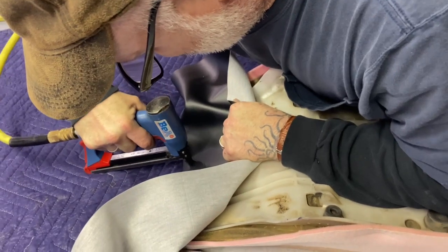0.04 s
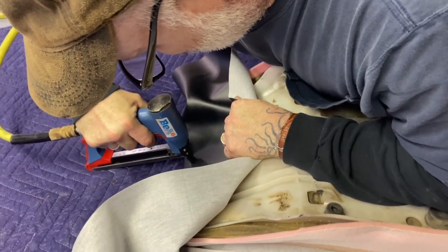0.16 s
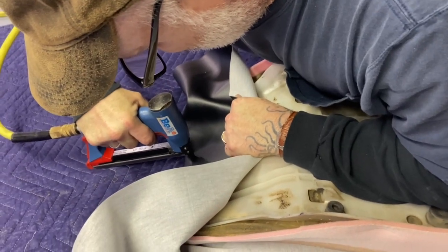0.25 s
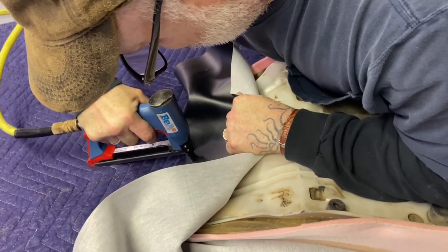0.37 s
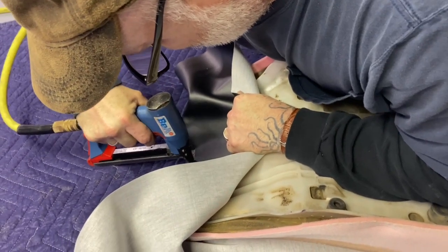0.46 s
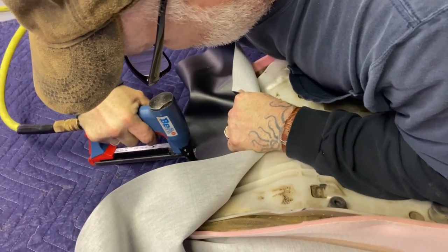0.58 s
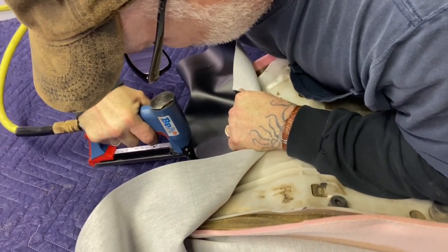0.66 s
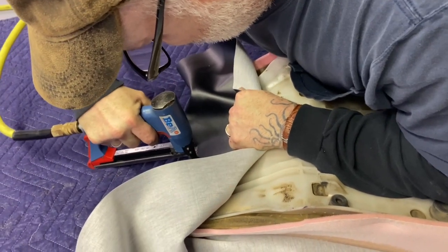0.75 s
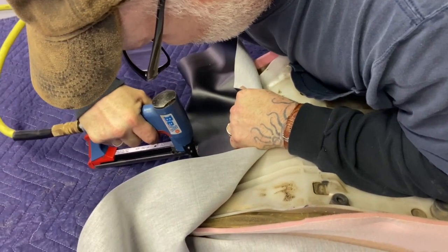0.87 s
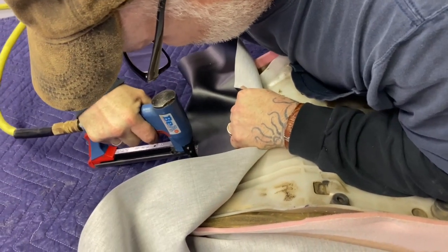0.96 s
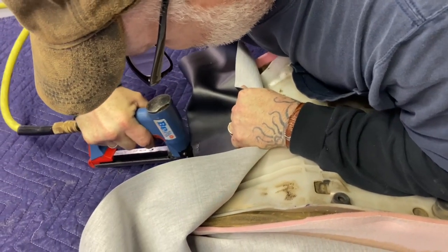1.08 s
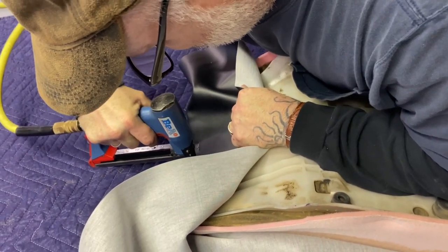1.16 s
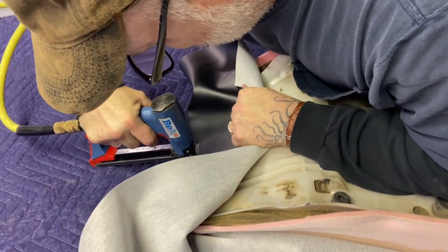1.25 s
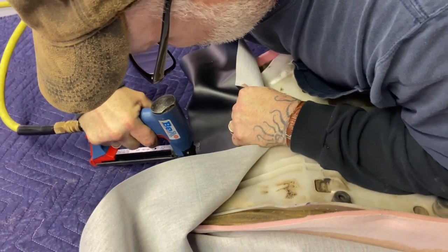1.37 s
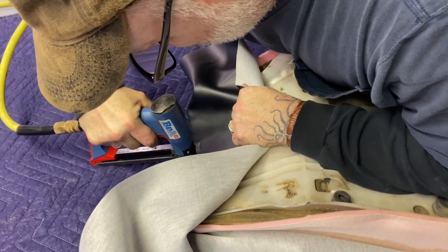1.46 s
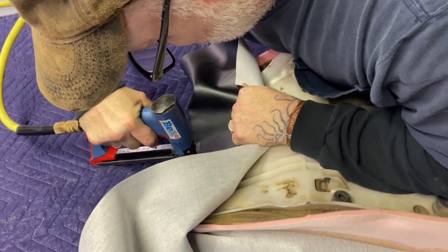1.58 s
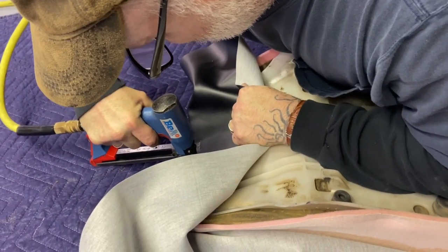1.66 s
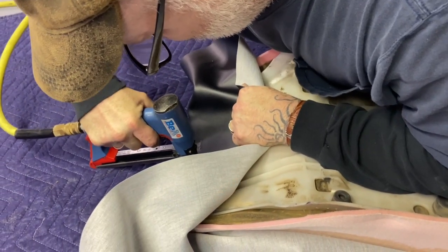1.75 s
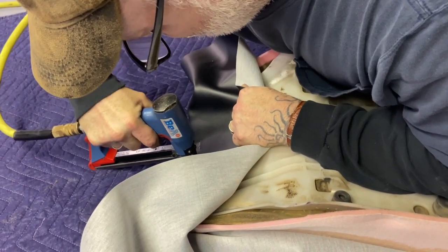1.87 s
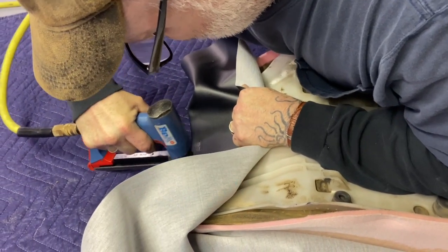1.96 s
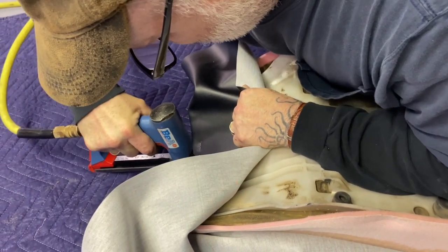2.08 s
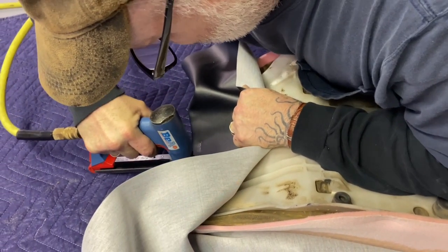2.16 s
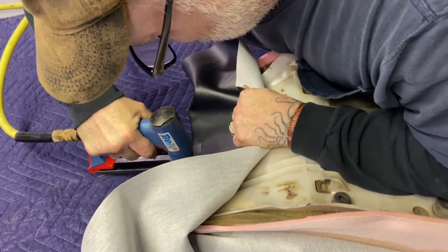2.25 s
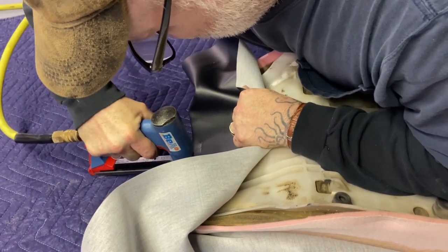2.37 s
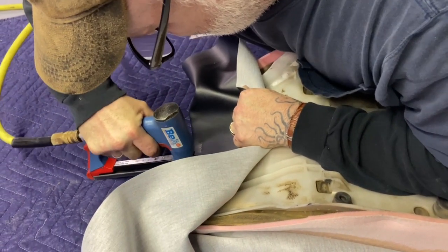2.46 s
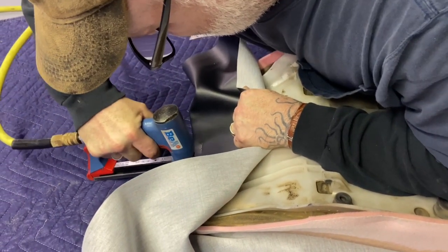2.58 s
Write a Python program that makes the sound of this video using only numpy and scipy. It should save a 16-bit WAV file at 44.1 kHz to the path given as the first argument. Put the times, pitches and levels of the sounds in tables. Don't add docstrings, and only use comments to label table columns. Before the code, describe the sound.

Close up in a small workshop, an air stapler cracks three times at uneven spacing, each shot followed by a valve knock and short exhaust puff, with faint vinyl ticks and low rumble between, captured in stereo.

```python
import sys
import numpy as np
from scipy import signal
from scipy.fft import rfft, irfft
from scipy.io import wavfile
from scipy.ndimage import uniform_filter1d

SR = 44100
rng = np.random.default_rng(int(sys.argv[2]) if len(sys.argv) > 2 else 0)


def magnitude_from_level(level_db):
    exponent = np.asarray(level_db, float) / 20
    return 10 ** exponent


def dump_mix(stems):
    frames = np.atleast_2d(stems).T
    limited = np.clip(frames, -1, 1)
    pcm = np.round(limited * 32767).astype(np.int16)
    wavfile.write(sys.argv[1], SR, pcm)


N = 114660
T = np.arange(N) / SR
HZ = np.fft.rfftfreq(N, 1 / SR)

# strike_s, strike_db, release_s, knock_db, vent_db
FIRINGS = [
    (0.2606, 1, .3584, -1, -14),
    (0.8473, 0, .9856, 2.5, -12),
    (1.7371, -0.5, 1.8687, 2, -11.5),
]
# start_s, tool_db, bench_db
BUMPS = [
    (0.7876, -35, -45),
    (.7930, -26.5, -42),
    (2.0765, -42, -23),
]
RETURN_S = 0.022
STRIKE_LEAD_S = .005


def strike():
    # start_s after the strike, nose_db, blade_db
    blows = [
        (-.0002, -37.5, -6.5),
        (.0008, -12.5, -13),
        (.0035, -23, -14.5),
        (.0045, -29.5, -13.5),
        (.0053, -3.5, -22),
        (.0070, -7, -27.5),
    ]
    # pitch_hz, level_db, t60_s
    nose_modes = [(524, -2, 0.03), (700, -2, 0.042), (963, -1, 0.016), (1340, -6, .03)]
    # pitch_hz, level_db, t60_s
    blade_modes = [(1890, -5.5, .007), (2280, 1.5, .008), (3144, 0.5, 0.0067), (4040, -10, 0.0028),
                   (4930, -12, 0.01), (7560, -3.5, 0.011)]
    t = T[:SR // 2] - STRIKE_LEAD_S
    tool = 0
    for start_s, nose_db, blade_db in blows:
        tool = tool + magnitude_from_level(nose_db) * ring(nose_modes, t - start_s)
        tool = tool - magnitude_from_level(blade_db) * ring(blade_modes, t - start_s)
    smother_s, smother_fade_s, smothered_db = 0.0094, 0.0014, -22.5
    free = 1 / (1 + np.exp(np.clip((t - smother_s) / smother_fade_s, -50, 50)))
    thud_hz, thud_db, peak_s, spread_s = 211, -14.5, .0082, 0.0038
    thud = np.exp(-((t - peak_s) / spread_s) ** 2 / 2) * np.cos(2 * np.pi * thud_hz * t)
    return tool * (free + magnitude_from_level(smothered_db)) + magnitude_from_level(thud_db) * thud


def firings():
    # pitch_hz, level_db
    buzz_spectrum = [(140, 0.5), (300, -5), (600, 1.5), (1100, -5.5), (2000, -4.5), (3300, -10),
                     (5000, -18), (16000, -42)]
    buzz_db, lag_s, t60_s = -29.5, 0.0027, 0.36
    rows, buzz = [], 0
    for strike_s, strike_db, *_ in FIRINGS:
        rows.append((strike_s - STRIKE_LEAD_S, strike_db))
        buzz = buzz + magnitude_from_level(strike_db + buzz_db) * fade(T - strike_s - lag_s, t60_s)
    return place(strike(), rows) + buzz * noise(buzz_spectrum)


def inlet_air():
    # open_s, rise_db_per_ms, hiss_db
    pulls = [
        (.246, 2.22, -18.5),
        (0.833, 3.5, -20.5),
        (1.724, 4.5, -22),
    ]
    # pitch_hz, level_db
    inlet_spectrum = [(300, -19), (1500, -8.5), (4000, -7), (7500, -5), (11000, 3.5), (15500, -1),
                      (16500, -28.5)]
    # pitch_hz, level_db
    seep_spectrum = [(1000, -25.5), (2200, 0), (5000, -1), (6000, -10), (7500, -4.5), (12000, -8.5),
                     (16000, -31.5)]
    creep_db_per_ms, cut_s, fade_s = 0.2068, .0065, 0.00084
    inlet = 0
    for (strike_s, *_), (open_s, rise_db_per_ms, hiss_db) in zip(FIRINGS, pulls):
        ms = 1000 * (T - open_s)
        swell_db = np.minimum(rise_db_per_ms * ms, creep_db_per_ms * np.minimum(ms, 30))
        shut = np.exp(-np.clip(T - strike_s - cut_s, 0, None) / fade_s)
        inlet = inlet + magnitude_from_level(hiss_db + swell_db) * shut
    seep = magnitude_from_level(-48) * fade(T - .2175, 0.27)
    return inlet * noise(inlet_spectrum) + seep * noise(seep_spectrum)


def crack_air():
    # pitch_hz, level_db
    crack_spectrum = [(200, -12.5), (1000, -6), (2000, 0), (3300, 14.5), (4500, -7), (7500, -1),
                      (12000, -14.5), (16500, -38)]
    crack_s, crack_db = .0095, -20
    crack = 0
    for strike_s, strike_db, *_ in FIRINGS:
        burst = np.exp(-(np.clip(T - strike_s, 0, 1) / crack_s) ** 4)
        crack = crack + magnitude_from_level(strike_db) * (T >= strike_s) * burst
    return magnitude_from_level(crack_db) * crack * noise(crack_spectrum)


def vent_air():
    # pitch_hz, level_db
    vent_spectrum = [(300, -24), (1500, -8.5), (3000, -5), (5000, -3.5), (8000, -5), (11500, -4.5),
                     (15500, -5), (16500, -31.5)]
    leak_s, leak_db = .002, -9
    lag_s, rise_s, vent_t60_s = .0034, 0.0011, 0.11
    puff_db, puff_t60_s = -16, 0.06
    vent = 0
    for _, _, release_s, _, vent_db in FIRINGS:
        leak = magnitude_from_level(leak_db) * np.clip(1 - np.abs(T - release_s) / leak_s, 0, 1)
        t = T - release_s - lag_s
        blow = fade(t, vent_t60_s) * (1 - np.exp(-np.clip(t, 0, 1) / rise_s))
        puff = magnitude_from_level(puff_db) * fade(T - release_s - RETURN_S, puff_t60_s)
        vent = vent + magnitude_from_level(vent_db) * (leak + blow + puff)
    return vent * noise(vent_spectrum)


def air():
    gust_db, gust_hz = 2, 343.4
    return (inlet_air() + crack_air() + vent_air()) * magnitude_from_level(gust_db * walk(gust_hz))


def tool_knocks():
    # pitch_hz, level_db, t60_s
    valve_modes = [(1058, -7, 0.042), (1990, 7.5, 0.0042), (2690, -9.5, .02)]
    # pitch_hz, level_db, t60_s
    touch_modes = [(744, -4, 0.024), (1077, 1.5, 0.013), (1500, -1.5, 0.0061), (2240, -3, .006),
                   (2940, -4.5, 0.0037)]
    knocks = []
    for _, _, release_s, knock_db, _ in FIRINGS:
        knocks += [(release_s, knock_db - 14.5), (release_s + RETURN_S, knock_db - 20.5)]
    touches = [(start_s, tool_db) for start_s, tool_db, _ in BUMPS]
    t = T[:SR // 4]
    return place(ring(valve_modes, t), knocks) + place(ring(touch_modes, t), touches)


def bending_wave():
    # pitch_hz, level_db
    bench_response = [(35, -24), (60, -4.5), (100, -10), (160, 1.5), (220, -4.5), (340, -16.5), (560, 0.5),
                      (1000, -6.5)]
    start_hz, fall, t60_s, phase, rise_s = 1100, .75, 0.24, 0.2, 0.00049
    pitch_hz = start_hz * (1000 * T + 0.35) ** -fall
    chirp = fade(T, t60_s) * np.sin(2 * np.pi * np.cumsum(pitch_hz) / SR + phase)
    chirp = chirp * (1 - np.exp(-T / rise_s))
    return irfft(rfft(chirp) * response(bench_response), N)[:SR // 2]


def bench_knocks():
    knocks = [(start_s, bench_db) for start_s, _, bench_db in BUMPS]
    for strike_s, strike_db, release_s, knock_db, _ in FIRINGS:
        knocks += [(strike_s, strike_db - 22),
                   (release_s, knock_db - 13.5),
                   (release_s + RETURN_S, knock_db - 25)]
    return place(bending_wave(), knocks)


def vinyl():
    # start_s, level_db, pitch_hz
    ticks = [(0.001, -55, 710), (0.095, -58.5, 1300), (0.136, -62, 1490), (0.142, -53.5, 1480),
             (0.166, -58, 3080), (0.176, -58.5, 1500), (0.61, -54, 703), (0.729, -61.5, 770),
             (1.249, -56.5, 703), (1.266, -63, 1850), (1.288, -77, 2710), (1.298, -67, 2032),
             (1.315, -57, 860), (1.327, -60.5, 1853), (1.35, -63, 837), (1.458, -67, 1810),
             (1.501, -60.5, 1215), (1.535, -63, 770), (1.664, -64, 1340), (2.129, -59.5, 719),
             (2.554, -71, 1540)]
    # time_s, level_db
    slide = [(0, -63), (.06, -83), (.15, -78), (.3, -96), (1.2, -96), (1.3, -78), (1.4, -93.5),
             (1.5, -78.5), (1.6, -90.5), (2.2, -92.5), (2.3, -73.5), (2.45, -77), (2.6, -89.5)]
    # pitch_hz, level_db
    cloth = [(150, -21), (400, 0.5), (850, -3), (1250, -1), (1700, -10), (3000, -15), (8000, -23)]
    tick_db, t60_s, width, open_hz, open_db = 8, 0.045, 0.71, 2100, -6
    out = magnitude_from_level(np.interp(T, *np.array(slide).T)) * noise(cloth)
    for start_s, level_db, pitch_hz in ticks:
        grit = rng.standard_normal(N) * magnitude_from_level(level_db + tick_db) * fade(T - start_s, t60_s)
        for centre_hz, gain_db in ((pitch_hz, 0), (open_hz, open_db)):
            once = band(grit, centre_hz, centre_hz * width)
            out = out + magnitude_from_level(gain_db) * band(once, centre_hz, centre_hz * width)
    return out


def shop():
    # pitch_hz, level_db
    rumble = [(22, -8.5), (70, 0.5), (135, -10.5), (190, -25.5), (420, -38), (1400, -53), (3600, -70.5),
              (10000, -55)]
    hum_hz, hum_db = 213, -72
    level_db = -54 + 2.5 * walk(11)
    return magnitude_from_level(level_db) * noise(rumble) + magnitude_from_level(hum_db) * np.sin(2 * np.pi * hum_hz * T)


def room(x):
    # pitch_hz, t60_s, level_db
    decay = [(56.5, .6, 2), (198, 0.15, -3), (394, 0.45, 3), (800, 0.093, 2), (1500, 0.37, 4),
             (2500, 0.46, -4), (4770, 0.39, -1), (11900, 0.17, -13.5)]
    hz, t60_s, level_db = np.array(decay).T
    gap_s, room_db = .004, -18.5
    tail = 0
    for f in 60 * 2. ** np.arange(0, 8.1, .5):
        band_t60_s = np.interp(np.log(f), np.log(hz), t60_s)
        band_db = np.interp(np.log(f), np.log(hz), level_db)
        echoes = band(rng.standard_normal(N), f, f / 2.2)
        tail = tail + echoes * fade(T - gap_s, band_t60_s) * magnitude_from_level(band_db)
    tail = tail[:SR]
    return signal.fftconvolve(x, tail / np.sqrt(np.sum(tail ** 2)))[:N] * magnitude_from_level(room_db)


def ring(modes, t):
    contact_s = 0.00028
    soft = 1 - np.exp(-np.clip(t, 0, 1) / contact_s)
    return soft * sum(magnitude_from_level(db) * fade(t, t60) * np.sin(2 * np.pi * hz * t) for hz, db, t60 in modes)


def fade(t, t60):
    return (t >= 0) * magnitude_from_level(-60 * np.clip(t, 0, None) / t60)


def response(points):
    hz, db = np.array(points, float).T
    return magnitude_from_level(np.interp(np.log(HZ + 1), np.log(hz), db))


def noise(points):
    x = irfft(rfft(rng.standard_normal(N)) * response(points), N)
    return x / x.std()


def band(x, hz, width):
    return signal.lfilter(*signal.iirpeak(hz, hz / width, fs=SR), x)


def place(sound, rows):
    at = np.zeros(N)
    for start_s, level_db in rows:
        at[int(start_s * SR)] += magnitude_from_level(level_db)
    return signal.fftconvolve(at, sound)[:N]


def walk(hz):
    k = int(SR / hz)
    return uniform_filter1d(np.repeat(rng.standard_normal(N // k + 1), k), k)[:N]


def scene():
    # pitch_hz, left_lead_rad, left_minus_right_db
    ports = [(500, .35, 1.6), (1460, .8, 2.2), (3010, .25, 2.4), (7200, -.1, 0), (11100, -6.3, 0),
             (15400, -12.5, .3)]
    blows = firings()
    rest = air() + tool_knocks() + bench_knocks() + vinyl()
    near = rest + magnitude_from_level(-9) * blows
    heard = rfft(rest + blows + room(near) + shop())
    hz, lead_rad, left_right_db = np.array([(0, 0, 0)] + ports).T
    half = magnitude_from_level(np.interp(HZ, hz, left_right_db) / 2) * np.exp(.5j * np.interp(HZ, hz, lead_rad))
    high_pass = signal.butter(2, 500, "high", fs=SR, output="sos")
    apart = signal.sosfilt(high_pass, room(near)) * magnitude_from_level(-9.5)
    return np.array([irfft(heard * half, N) + apart, irfft(heard / half, N) - apart])


def top_cut(x):
    return signal.sosfilt(signal.butter(12, 16950, fs=SR, output="sos"), x)


def record(dry):
    ceiling = np.array([.85, 1.3])
    x = signal.sosfilt(signal.butter(2, 41.7, "high", fs=SR, output="sos"), dry)
    x = signal.sosfilt(signal.ellip(8, .2, 60, 16000, fs=SR, output="sos"), x)
    top = np.where(x < 0, ceiling[1], ceiling[0])
    return top_cut(top * np.tanh(x / top))


dry = scene()
out = record(dry)
dump_mix(out)
```